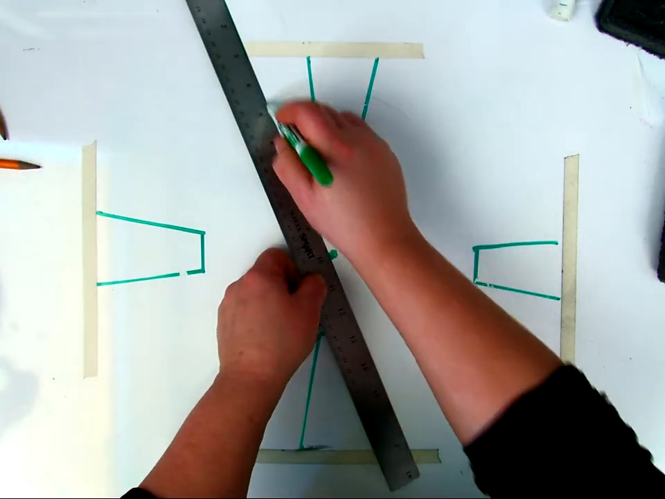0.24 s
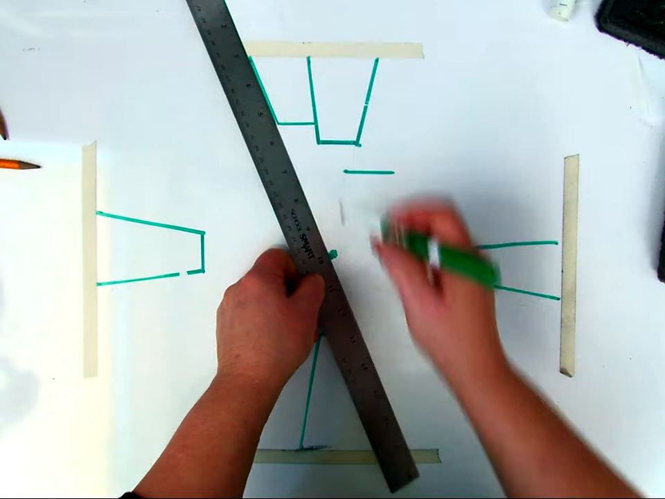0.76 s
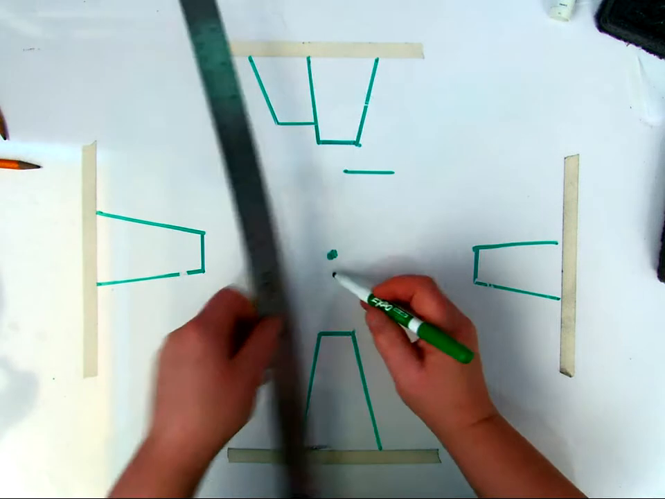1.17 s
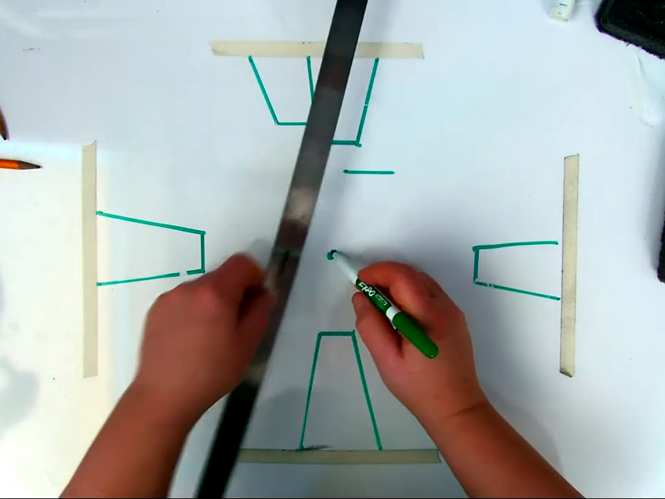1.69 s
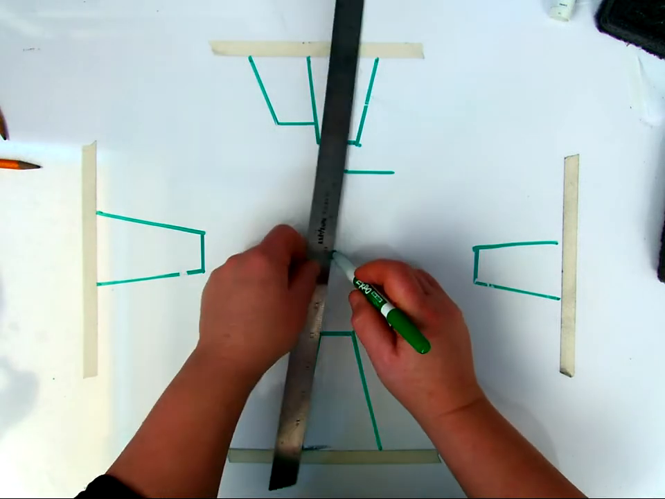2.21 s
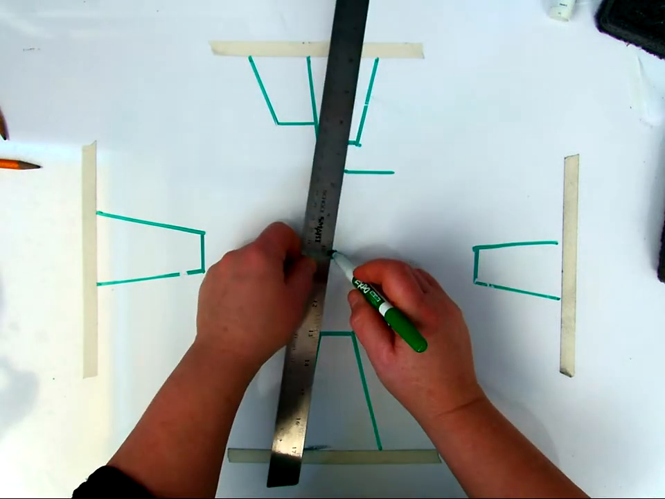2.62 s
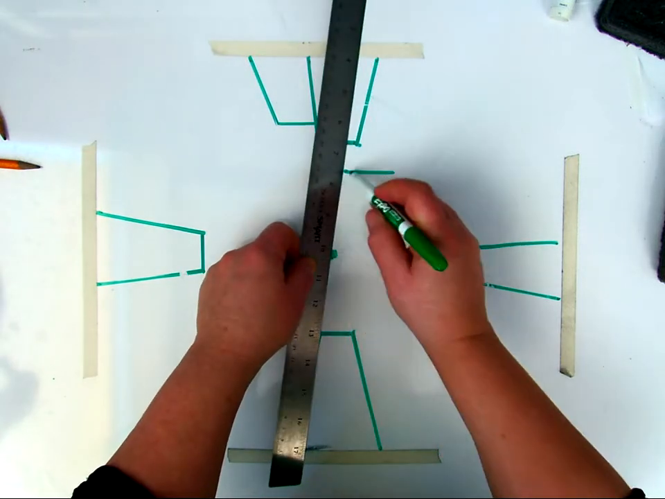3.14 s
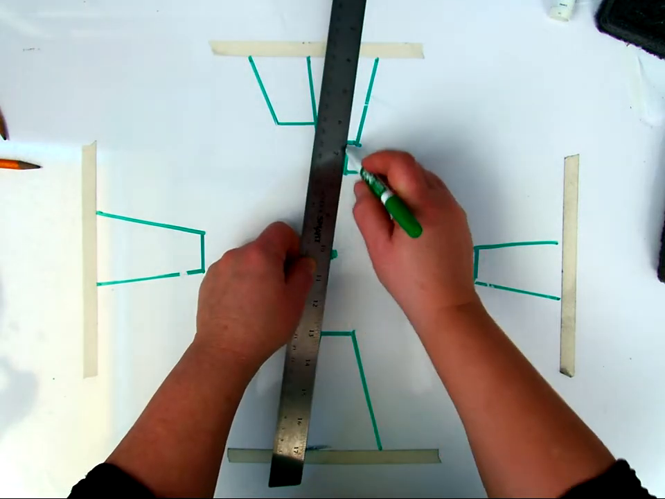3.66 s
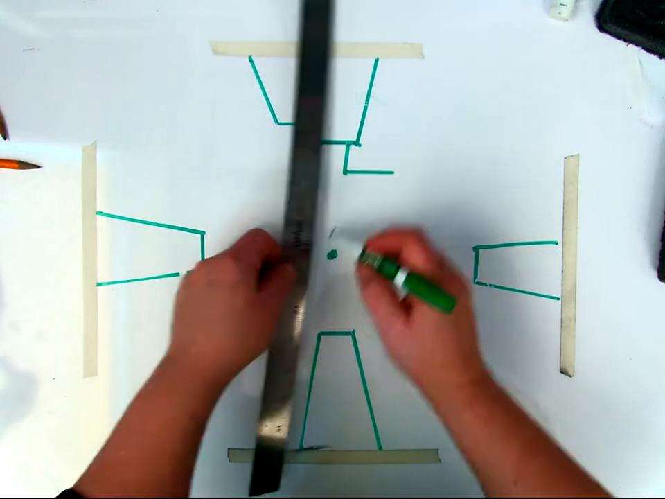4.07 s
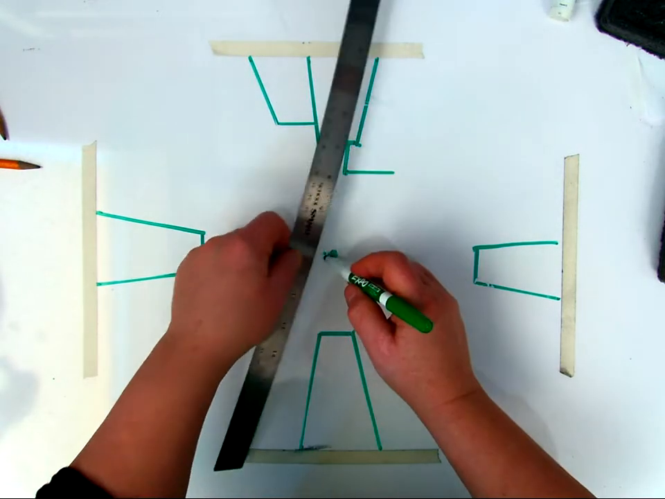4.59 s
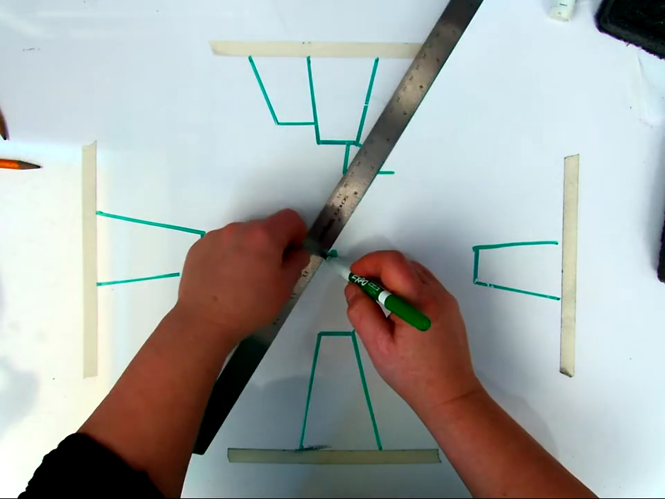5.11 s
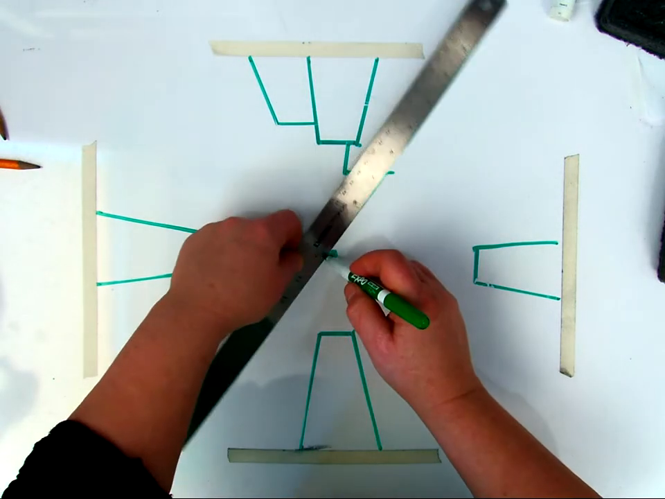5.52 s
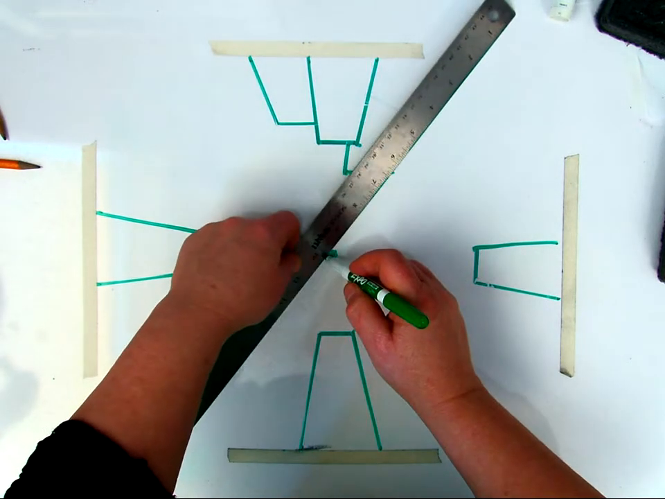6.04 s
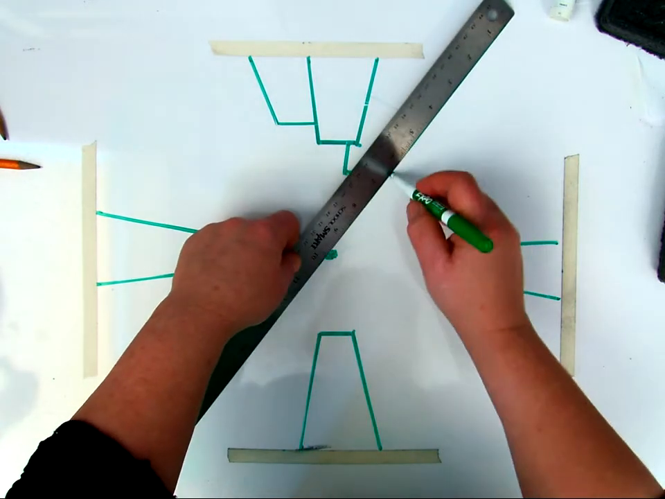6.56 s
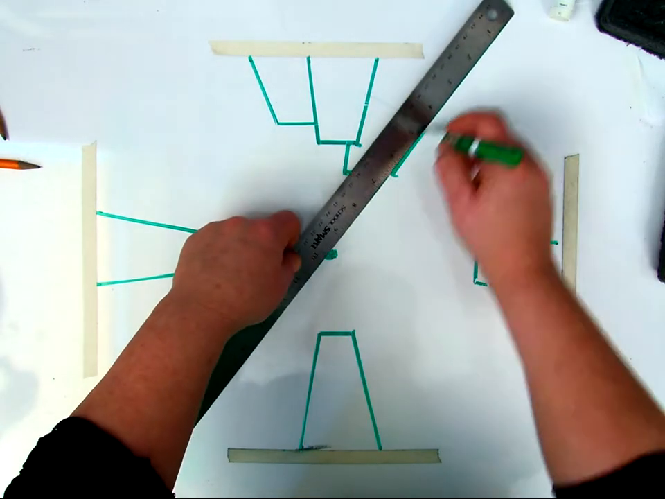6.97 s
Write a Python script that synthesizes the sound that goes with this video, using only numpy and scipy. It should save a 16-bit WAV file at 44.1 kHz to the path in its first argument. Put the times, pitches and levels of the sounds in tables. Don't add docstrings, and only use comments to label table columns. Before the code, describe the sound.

Mains hum and a slower motor tone throb steadily beneath dull rushing air. Over it, small desk sounds: dry felt marker rubbing along a thin metal ruler, a cluster of four sharp ringing clicks, tiny squeaks, a group of muted taps around the middle, and finally two hissy strokes with one faint tick. Mono, modest microphone with limited treble, small quiet room.

```python
import sys
import numpy as np
from scipy import signal
from scipy.fft import rfft, irfft, next_fast_len
from scipy.io import wavfile
from scipy.ndimage import uniform_filter1d

SR = 44100
rng = np.random.default_rng(int(sys.argv[2]) if len(sys.argv) > 2 else 0)


def put_to_file(sound):
    columns = np.atleast_2d(sound).T
    safe = np.clip(columns, -1, 1)
    whole_steps = np.round(safe * 32767)
    wavfile.write(sys.argv[1], SR, whole_steps.astype(np.int16))


def gain_from_db(level_db):
    decades = np.asarray(level_db, float) / 20
    return 10 ** decades


N = 319889
TIME = np.arange(N) / SR

# (f/Hz, level/dB, time to fall by 60 dB/s)
RULER_MODES = [(1860, -20.5, 0.013), (2470, -8, 0.034), (2750, -11, 0.021), (3346, 5, 0.053),
               (3653, -6.5, 0.053), (3870, -11, 0.013), (4380, -15, 0.021), (5400, -16, 0.019),
               (6200, -12, 0.017), (6240, -33, 0.023), (6780, -10, 0.018), (7590, -10.5, 0.03),
               (7330, -20.5, .03)]


def walk(rate):
    k = int(SR / rate)
    steps = np.repeat(rng.standard_normal(N // k + 1), k)
    return 1.3 * uniform_filter1d(uniform_filter1d(steps, k), k)[:N]


def band(lo_hz, hi_hz):
    sos = signal.butter(2, [lo_hz, hi_hz], "bandpass", fs=SR, output="sos")
    x = signal.sosfilt(sos, rng.standard_normal(N))
    return x / np.std(x)


def tone(hz):
    turns = np.cumsum(hz + 0 * TIME) / SR + rng.random()
    return np.sqrt(2) * np.sin(2 * np.pi * turns)


def ring(x, hz, t60):
    r = np.exp(-np.log(1000) / (t60 * SR))
    w = 2 * np.pi * hz / SR
    return np.sin(w) * signal.lfilter([1], [1, -2 * r * np.cos(w), r * r], x)


def machines():
    # (f/Hz, level/dB, pitch wander/Hz)
    thin_tones = [(355.7, -65, .3), (379.7, -62, .5), (415, -72, .5), (599.1, -75, .1), (898.7, -75, .1),
                  (6439, -78.5, 5)]
    motor_hz, blades = 105.34, 4
    mains = gain_from_db(-39 + .5 * walk(0.83)) * tone(120.07)
    motor = gain_from_db(-44.5 + 1.1 * walk(3.0)) * tone(motor_hz)
    shaft = gain_from_db(-53 + 4.5 * walk(1.6)) * tone(motor_hz / blades)
    thin = sum(gain_from_db(db + 2.2 * walk(3.9)) * tone(hz + wander * walk(.8)) for hz, db, wander in thin_tones)
    rumble = gain_from_db(-43.5) * band(16, 16.5)
    return mains + motor + shaft + thin + rumble


def air():
    # (f/Hz, level in each Hz/dB)
    steady_noise = [(27, -59), (50, -65), (72, -67.5), (100, -63), (122, -62.5), (145, -74), (205, -72.5),
                    (235, -80), (400, -82), (800, -88),
                    (2500, -95.8), (3200, -98.8), (4600, -99.6), (5400, -101), (8000, -101.8)]
    size = next_fast_len(N)
    hz = np.maximum(np.arange(size // 2 + 1) * SR / size, 1)
    points = np.array(steady_noise)
    level_db = np.interp(np.log(hz), np.log(points[:, 0]), points[:, 1], left=-120)
    colour = gain_from_db(level_db) * np.sqrt(SR / 2)
    noise = irfft(rfft(rng.standard_normal(size)) * colour, size)[:N]
    return noise * gain_from_db(0.13 * walk(2.3))


def chirps():
    # (t/s, length/s, f/Hz, level/dB)
    squeaks = [(1.382, 0.13, 1716, -63), (1.556, 0.11, 2373, -65.5), (2.62, 0.15, 1960, -68.5),
               (2.686, 0.11, 1475, -65), (2.794, 0.19, 1433, -65), (3.24, 0.19, 1390, -69),
               (5.844, 0.068, 993, -60.5), (5.942, 0.11, 987, -60), (6.117, 0.067, 987, -62),
               (6.46, 0.11, 2180, -66.5)]
    out = np.zeros(N)
    for s, length, hz, db in squeaks:
        swell = np.sqrt(np.abs(np.sin(np.pi * np.clip((TIME - s) / length, 0, 1))))
        out += gain_from_db(db + 1.5 * walk(40)) * swell * tone(hz + 22 * walk(45))
    return out


def slides():
    # (start t/s, hold/s, ruler ring level/dB, felt hiss level/dB)
    strokes = [
        (-.05, .27, -65, -60.5),
        (0.764, 0.02, -66, -68),
        (3.46, 0.13, -63, -64),
        (3.898, .06, -73, -84),
        (3.974, 0.028, -66, -71),
        (4.876, 0.089, -59, -61.5),
        (5.34, 0.05, -66, -65),
        (6.724, .14, -61, -59),
        (6.964, 0.11, -66, -58.5),
    ]
    attack_s, release_s = .05, 0.044
    grit = rng.standard_normal(N) * gain_from_db(1.9 * walk(70))
    steel = sum(gain_from_db(db) * ring(grit, hz, 0.75 * t60) for hz, db, t60 in RULER_MODES if hz < 5000)
    steel = steel / np.std(steel) + gain_from_db(-6.5) * band(3350, 3600) + gain_from_db(-5.0) * band(1900, 2600)
    felt = (band(6200, 8300) + gain_from_db(-11.5) * band(4950, 5350)) * gain_from_db(0.68 * walk(50))
    out = np.zeros(N)
    for s, hold, steel_db, felt_db in strokes:
        early = (s - TIME) / attack_s
        late = (TIME - s - hold) / release_s
        pressure = gain_from_db(-10 * np.maximum(0, np.maximum(early, late)))
        out += pressure * (gain_from_db(steel_db) * steel + gain_from_db(felt_db) * felt)
    return out


def ticks():
    # (t/s, peak level/dB, treble minus peak/dB, rattle length/share of usual, crack minus peak/dB)
    touches = [(1.8241, -26, -1, 2, -11), (1.9475, -35, 0, 0.6, -9), (2.009, -27.5, -4.5, 1.2, -24),
               (2.034, -36, -3, 1.6, -20), (3.9858, -42, -20, 0.92, -5), (4.712, -47, -25, 0.88, 5),
               (4.77, -42.5, -22, 0.59, -9.0), (4.8544, -42, 2.5, 0.93, -10), (4.8853, -35, -17, 0.45, -11),
               (5.0076, -50, -13, 1, -4), (6.9496, -45, 1, 1, -11)]
    out = np.zeros(N)
    t = np.arange(SR // 4) / SR
    for s, peak_db, treble_db, share, crack_db in touches:
        chance = rng.standard_normal((3, len(t)))
        fade = np.exp(-t / (0.014 * np.clip(share, .1, 3)))
        rattle = chance[0] * (np.exp(-t / .003) + gain_from_db(-7) * fade)
        modes = sum(gain_from_db(db + (hz > 5000) * (treble_db + 10.0)) * ring(rattle, hz, t60)
                    for hz, db, t60 in RULER_MODES)
        burst = chance[1] * (np.exp(-t / 0.002) + gain_from_db(-9.0) * fade)
        board = gain_from_db(-19.5) * ring(burst, 2300, 0.0024)
        board += gain_from_db(treble_db - 20.5) * ring(burst, 6530, 0.0055)
        board += gain_from_db(-17.5) * ring(burst, 3640, 0.003)
        crack = np.diff(chance[2], prepend=0) * np.exp(-t / 0.0068)
        hit = modes / np.max(np.abs(modes)) + board + gain_from_db(crack_db) * crack
        i = int((s - .0006) * SR)
        out[i:i + len(t)] += gain_from_db(peak_db - 5.5) * hit[:N - i]
    return out


def scene():
    return (machines() + air() + chirps() + slides() + ticks())[None]


def band_limit(x):
    return signal.sosfilt(signal.butter(12, 8300, fs=SR, output="sos"), x)


def record(dry):
    lowpass = signal.ellip(10, .3, 60, 7780, fs=SR, output="sos")
    offset = .0424
    return band_limit(signal.sosfilt(lowpass, dry) + offset)


dry = scene()
out = record(dry)
put_to_file(out)
```